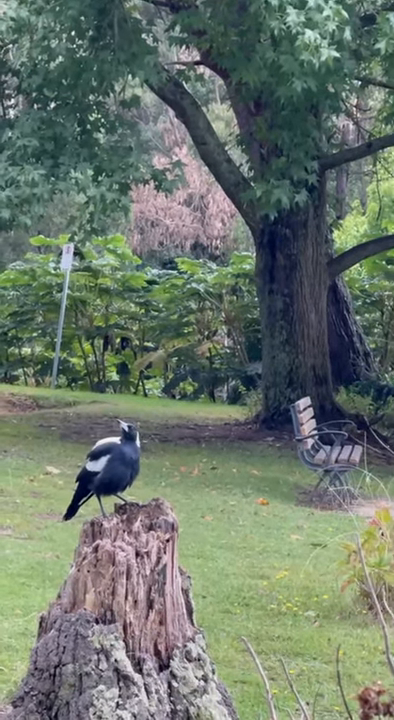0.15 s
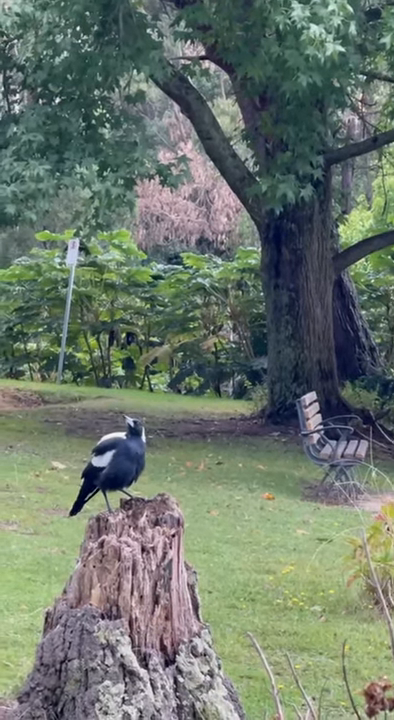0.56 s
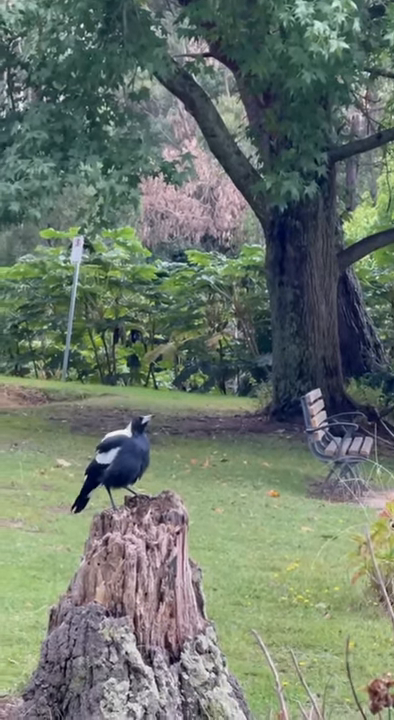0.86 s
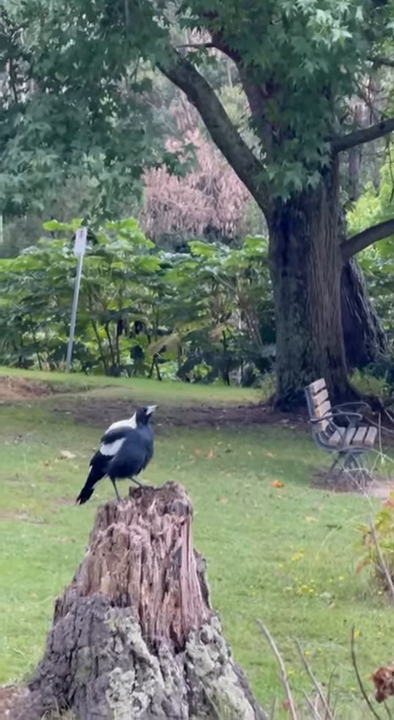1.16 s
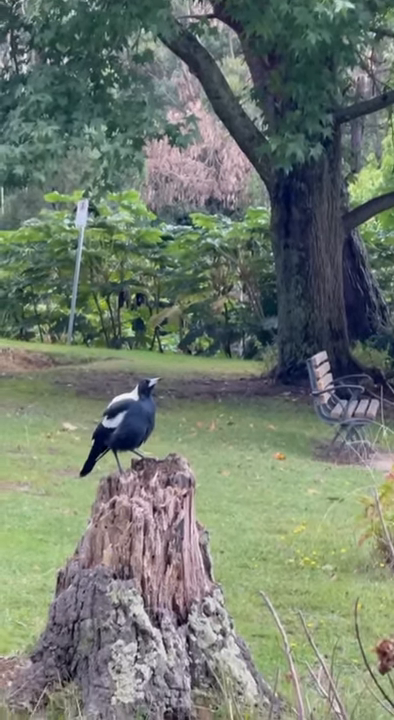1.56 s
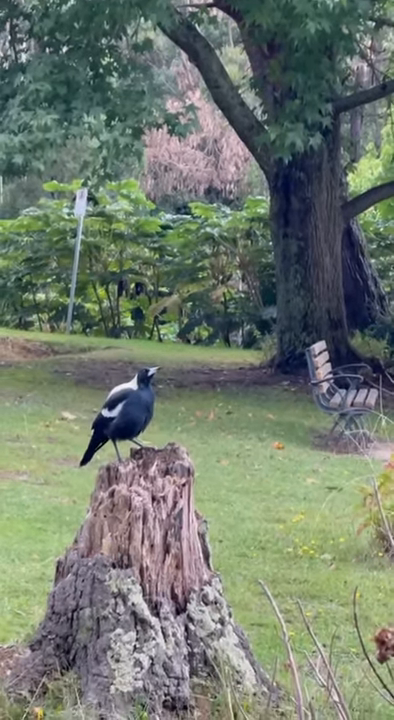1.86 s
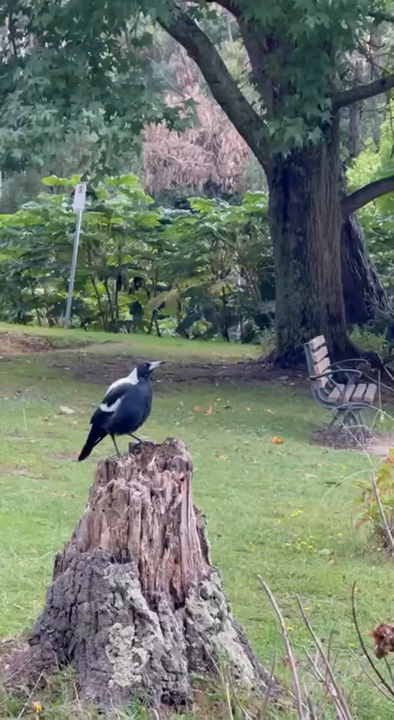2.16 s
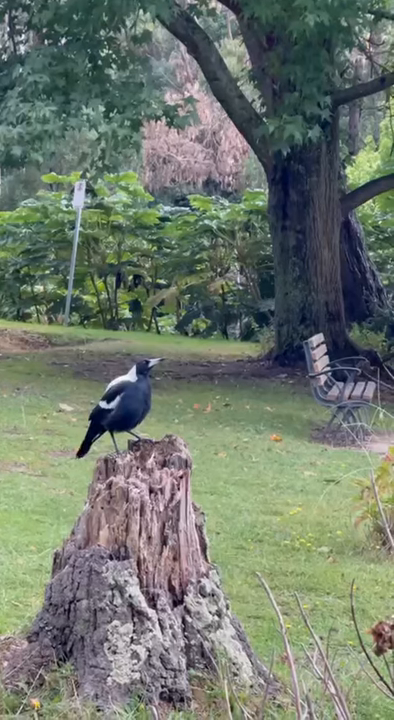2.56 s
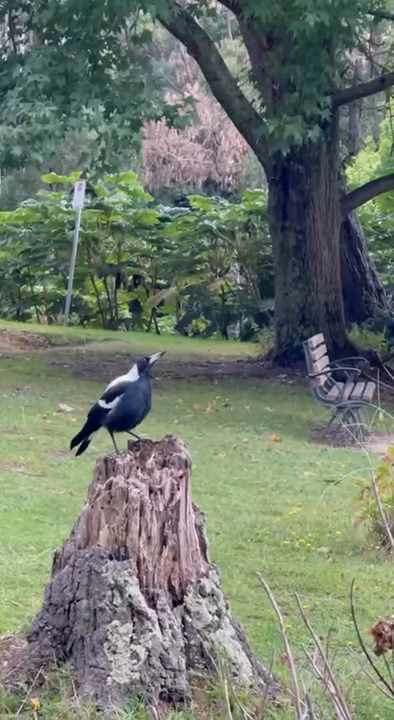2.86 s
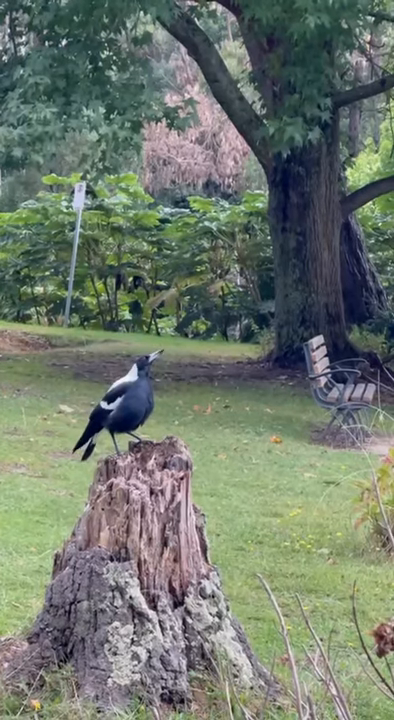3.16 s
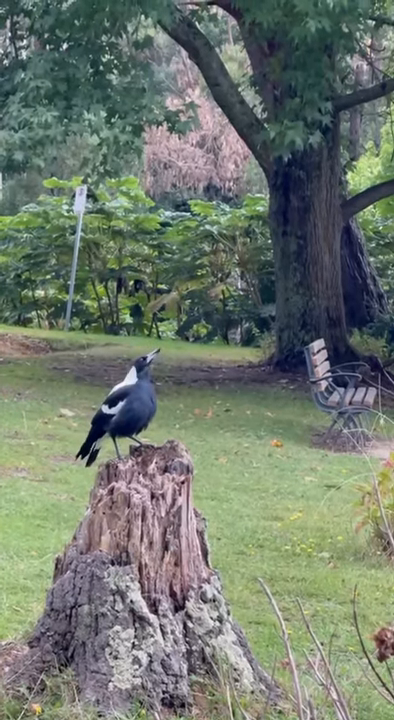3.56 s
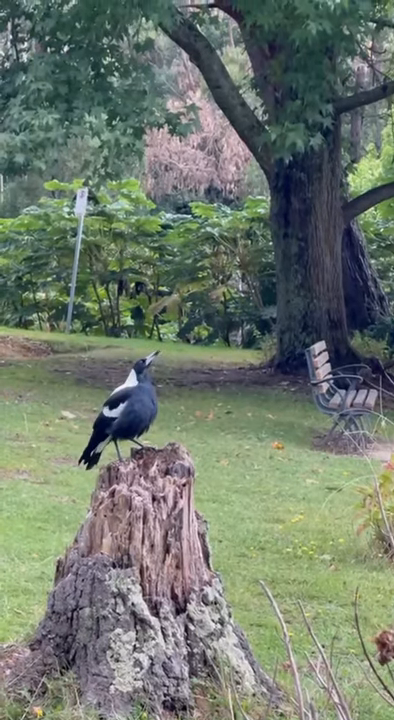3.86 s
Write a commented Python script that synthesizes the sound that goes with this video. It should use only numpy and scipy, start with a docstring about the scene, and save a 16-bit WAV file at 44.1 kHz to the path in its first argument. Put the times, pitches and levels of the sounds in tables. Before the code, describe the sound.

A magpie's fluting, warbled notes come in after a few seconds of quiet park background: soft insect hiss, pulsing frogs or crickets, far traffic and faint birds. The song grows louder near the end, echoing lightly among trees.

```python
"""A magpie on a stump in a quiet park starts its song: flute notes, short pips and warbled notes.
Each note is a gliding tone with hoarse overtones and breath; extra tones close beside it make it warble.
Behind it traffic rumbles, leaves rustle, frogs or crickets pulse, insects hiss in the trees, a far bird
whistles and a small bird chirps. Trees echo the birds, and the two microphone openings of a phone
hear the treble out of step."""
import sys
import numpy as np
from scipy import signal
from scipy.fft import rfft, irfft, next_fast_len
from scipy.io import wavfile
from scipy.ndimage import uniform_filter1d, map_coordinates

SR = 44100
rng = np.random.default_rng(int(sys.argv[2]) if len(sys.argv) > 2 else 0)


def transcribe(u):
    """Save the signal u as a 16-bit wav file named by the first command-line argument.

    u: samples, shape (n,) or (channels, n), limited to [-1, 1]; the rate is SR.
    q: integer samples, one column per channel.
    """
    v = np.clip(np.atleast_2d(u).T, -1, 1)
    q = np.round(v * 32767).astype(np.int16)
    wavfile.write(sys.argv[1], SR, q)


N = 176400
T = np.arange(N) / SR


def amp(db):
    """Turn decibels into a gain."""
    return 10 ** (np.asarray(db) / 20)


def unit(x):
    """Scale x to an average (rms) level of 1."""
    return x / np.sqrt(np.mean(x ** 2) + 1e-20)


def along(points, hz):
    """Read between (frequency_hz, value) points on a log frequency scale."""
    f, v = np.transpose(points)
    return np.interp(np.log(hz + 1), np.log(f + 1), v)


def filtered(x, response):
    """Multiply each frequency in x by response(hz)."""
    size = next_fast_len(N + SR // 2)
    return irfft(rfft(x, size) * response(np.fft.rfftfreq(size, 1 / SR)), size)[..., :N]


def wobble(rate):
    """A smooth curve through rate random points a second."""
    return map_coordinates(rng.standard_normal(int(N * rate / SR) + 4), [T * rate])


def noise(spectrum, patchy_db):
    """Stereo noise of level 1 with random louder and softer patches."""
    # stereo width, side compared with middle: frequency_hz, level_db
    width = [(30, -32), (60, -23), (110, -18), (190, -11), (340, -5), (610, -1), (1080, -3), (1500, -10),
             (1930, -20), (3450, -20), (6500, -26), (8000, -17)]
    white = signal.stft(rng.standard_normal((2, N)), nperseg=1024)[2]
    patches = uniform_filter1d(rng.standard_normal(white.shape[1:]), size=5, axis=0)
    patches = uniform_filter1d(patches, size=4, axis=1)
    pair = signal.istft(white * amp(patchy_db * unit(patches)), nperseg=1024)[1][:, :N]

    def gains(hz):
        gain = amp(along(spectrum, hz)) * (hz > .5 * spectrum[0][0]) * (hz < 2 * spectrum[-1][0])
        return gain * np.array([np.ones_like(hz), amp(along(width, hz))])
    mid, side = filtered(pair, gains)
    return unit(np.array([mid + side, mid - side]))


def add(out, start_s, x):
    """Mix x into out from start_s on."""
    i = round(start_s * SR)
    out[i:i + len(x)] += x[:N - i]


def ramp(u):
    """A smooth fade from 0 to 1."""
    return np.sin(np.pi / 2 * np.clip(u, 0, 1)) ** 2


def phase_of(hz):
    """The running phase of a changing pitch, in radians."""
    return 2 * np.pi * np.cumsum(hz) / SR


def traffic():
    """Far traffic makes a low rumble whose level dips now and then."""
    # loudness of the rumble: time_s, level_db
    levels = [(0.0, -79.5), (0.26, -68.5), (0.39, -61), (1.58, -61), (1.66, -74), (1.71, -61.5),
              (2.33, -58.5), (2.35, -80), (2.38, -62.5), (3.58, -62), (3.64, -69.5), (4.0, -67.5)]
    # its tone colour: frequency_hz, level_db
    colour = [(15, -39.5), (25, -11.5), (45, -6.5), (70, 1.5), (138, -7.5), (149, -4.5), (173, -14),
              (300, -25), (390, -49.5), (660, -120)]
    return amp(np.interp(T, *np.transpose(levels)) + 1.3 * wobble(8.6)) * noise(colour, patchy_db=1.0)


def leaves():
    """Air in the leaves makes a low, swelling rush and a brighter, steadier rustle."""
    # tone colour of the leaves: frequency_hz, level_db
    colour = [(200, 0.5), (400, -0.5), (570, -8.5), (1000, -13.5), (1500, -11.5), (2500, -16.5),
              (3340, -22), (3800, -23.5), (4800, -34), (6500, -23.5), (7200, -38)]
    # swells of the rush: time_s, relative_db
    swells = [(0.0, -84), (0.43, -77), (0.88, -75.5), (1.0, -80), (1.82, -87.5), (2.06, -82), (3.42, -83),
              (4.0, -76.5)]
    rush_db = np.interp(T, *np.transpose(swells)) + 5.5 + 0.54 * wobble(13)
    rush = amp(rush_db) * noise(colour[:4], patchy_db=2.5)
    rustle = amp(-75.5 + 0.27 * wobble(2.3)) * noise(colour[2:], patchy_db=3.5)
    return rush + rustle


def frogs_or_crickets():
    """One caller's short pulses ring over the blur of many far ones."""
    # the caller's pulses: start_s, relative_db
    pulses = [(0.0189, -61.5), (0.1151, -64.5), (0.2079, -62), (0.3037, -67), (0.3905, -63), (0.4948, -59),
              (1.05, -61.5), (1.1428, -66), (1.2366, -57.5), (1.3264, -63), (1.4162, -58), (1.512, -57),
              (1.6072, -56.5), (1.6995, -55.5), (1.7918, -59), (1.8861, -57), (1.9789, -58),
              (2.0757, -59.5), (2.1675, -59.5), (2.2568, -74), (2.355, -61), (2.4523, -61), (2.5446, -64),
              (2.6414, -62.5), (2.7282, -63), (2.817, -59), (2.8888, -65)]
    # tones that ring in a pulse: pitch_hz, relative_db, ring_s (time to fade by 60 dB)
    tones = [(1853, 1, 0.061), (1969, -6.5, 0.076), (2074.1, 7, 0.06), (2194, 2, 0.088), (2580, -14, 0.091)]
    # loudness of the far chorus: time_s, level_db
    chorus_levels = [(0.0, -76), (0.4, -73.5), (0.56, -79.5), (0.86, -83.5), (1.15, -75.5), (1.48, -75),
                     (3.02, -75), (3.25, -69.5), (3.52, -68.5), (4.0, -70)]
    # its tone colour: frequency_hz, level_db
    chorus_colour = [(1500, -13.5), (1850, -9.5), (2080, -1), (2250, -5), (2550, -13.5), (3000, -47)]
    caller, t = np.zeros(N), np.arange(SR // 10) / SR
    for start, db in pulses:
        stray_db, phases = rng.standard_normal((2, len(tones))) * [[2], [3]]
        ring = sum(amp(level + stray - 60 * t / ring_s) * np.sin(2 * np.pi * hz * t + phase)
                   for (hz, level, ring_s), stray, phase in zip(tones, stray_db, phases))
        add(caller, start, amp(db - 7) * ring * ramp(t / 0.0055))
    chorus_db = np.interp(T, *np.transpose(chorus_levels)) + 1.7 * wobble(22)
    return caller + amp(chorus_db) * noise(chorus_colour, patchy_db=1.5)[0]


def insects():
    """Insects hiss in the trees while a near one makes short, falling zips."""
    # the near insect's zips: start_s, relative_db
    calls = [(0.0937, -63), (0.21, -65), (0.3067, -65), (0.444, -63.5), (0.5594, -64.5), (0.6439, -72),
             (0.745, -67.5), (0.8405, -82), (1.036, -80), (1.1134, -76), (1.2176, -71), (1.349, -68.5),
             (1.4335, -81), (1.5464, -82), (1.6488, -82), (1.7798, -74), (1.9026, -72), (2.0058, -72),
             (2.1405, -68), (2.2549, -68), (2.3337, -69), (2.395, -68.5), (2.5082, -65), (2.6262, -65.5),
             (2.8714, -63), (2.99, -65), (3.11, -65), (3.238, -69), (3.3388, -69), (3.483, -69.5),
             (3.5934, -66), (3.6955, -65), (3.8565, -72), (3.9609, -67)]
    # tone colour of the hiss: frequency_hz, level_db
    colour = [(6500, -35.5), (6950, -10.5), (7300, -2), (7800, 3), (8300, 9.5), (8800, -18), (9500, -20),
              (10400, -17.5), (11500, -25.5)]
    zip_s, from_hz, to_hz = 0.027, 7640, 7000
    zips, u = np.zeros(N), np.linspace(0, 1, round(zip_s * SR))
    one_zip = np.sin(np.pi * u) * np.sin(phase_of(from_hz + (to_hz - from_hz) * u))
    for start, db in calls:
        add(zips, start, amp(db - 3) * one_zip)
    zips *= amp(2.0 * wobble(200))
    hiss_db = -68.5 + wobble(4) + 0.97 * wobble(7.6)
    return zips + amp(hiss_db) * noise(colour, patchy_db=2.5)


def far_bird():
    """Thin whistles: pure tones whose pitch bends once."""
    # whistles: start_s, length_s, from_hz, bend_hz, to_hz, level_db
    whistles = [(3.395, .03, 6130, 5510, 5340, -75.5), (3.804, .04, 2250, 2066, 1910, -64),
                (.10, 0.025, 3650, 3650, 3460, -76), (.68, 0.077, 3384, 3480, 3370, -80.5),
                (.96, 0.078, 3280, 3210, 3100, -80.5), (2.315, 0.0267, 2424, 2670, 2600, -70),
                (2.315, .03, 2014, 1740, 1810, -69.5), (2.92, 0.056, 2305, 2247, 2460, -68.5),
                (3.03, .03, 2433, 2385, 2300, -59.5), (3.055, 0.038, 2280, 2180, 2450, -61.5),
                (3.16, 0.074, 2340, 2208, 2450, -63), (3.24, 0.076, 2177, 2218, 2230, -63),
                (3.30, 0.077, 2300, 2160, 2504, -59), (3.45, 0.0992, 2270, 2134, 2266, -59.5),
                (3.61, 0.079, 2350, 2247, 2110, -61), (3.68, 0.062, 2112, 2130, 2220, -58)]
    out = np.zeros(N)
    for start, length, from_hz, bend_hz, to_hz, db in whistles:
        u = np.linspace(0, 1, round(length * SR))
        pitch = np.interp(u, [0, .6, 1], [from_hz, bend_hz, to_hz])
        add(out, start, amp(db) * np.sin(np.pi * u) * np.sin(phase_of(pitch)))
    return out


def small_bird():
    """Rough, nasal chirps: breath and the overtones of a pitch that arches up and down."""
    # chirps: start_s, length_s, top_hz, relative_db, start_drop, end_drop (shares of the top pitch)
    chirps = [(1.36, 0.043, 1500, -68.5, 0.143, .09), (2.06, 0.047, 1463, -61, .18, 0.17),
              (2.736, 0.044, 1432, -62, 0.19, .17)]
    # overtones of the voice: pitch_multiple, relative_db
    overtones = [(2, -26.5), (3, -2.5), (4, 3), (5, -2), (6, -8), (7, -6.5)]
    # tone colour of the breath: frequency_hz, level_db
    breath_colour = [(3000, 8), (4200, -13), (6000, -3), (8000, 9), (10500, 0), (11500, -25)]
    out, jitter = np.zeros(N), 0.0077 * wobble(400)
    breath = amp(-7.5) * noise(breath_colour, patchy_db=7.0)[0]
    for start, length, top_hz, db, start_drop, end_drop in chirps:
        u = np.linspace(-1, 1, round(length * SR))
        here = slice(round(start * SR), round(start * SR) + len(u))
        arch = 1 - np.where(u < 0, start_drop, end_drop) * np.abs(u) ** 2.24
        phase = phase_of(top_hz * (arch + jitter[here]))
        voice = sum(amp(level) * np.sin(n * phase) for n, level in overtones) + breath[here]
        add(out, start, amp(db) * (1 - u * u) ** 1.05 * voice)
    return out * amp(3.5 * wobble(260))  # fast flutter makes it rough


def warble(t, start, length, swell_s, from_hz, to_hz, below_db, above_db, step_db, lag):
    """Four side tones below a note and four above beat against it, so it warbles."""
    beat = phase_of(from_hz + (to_hz - from_hz) * t / length)
    beat = beat - np.interp(swell_s - start, t, beat) - lag
    return 1 + sum(amp(side_db + step_db * (k - 1)) * np.exp(1j * (side * k * beat - lag * k * k))
                   for k in range(1, 5) for side, side_db in ((-1, below_db), (0.99, above_db)))


def rasp(breath, colour):
    """The loudest magpie note rasps: a scrap of noise repeats at about the rate of its warble."""
    start_s, end_s, rise_s, fall_s = 3.684, 3.788, .012, .06
    repeat_hz, buzz_share = 92, 0.81
    scrap = rng.standard_normal(SR)[:round(SR / repeat_hz)]
    buzz = unit(filtered(np.resize(scrap, N), lambda hz: amp(along(colour, hz))))
    fade = ramp((T - start_s) / rise_s) * ramp((end_s - T) / fall_s)
    return amp(-54) * fade * (buzz_share * buzz + (1 - buzz_share ** 2) ** .5 * breath)


def magpie():
    """Gliding flute notes; as a note swells, its hoarse overtones and breath grow faster than its tone."""
    # pure notes and pips: start_s, length_s, rise_s, fall_s, from_hz, to_hz, level_db (before fading),
    # sag_db (lost over the note), overtones_db (relative)
    notes = [(2.882, .014, 0.0045, 0.0075, 705, 720, -48, 3, -28),
             (2.889, 0.01, 0.0053, .005, 997, 1099, -42, 5, -33),
             (3.028, 0.018, .005, .005, 1838, 1650, -50.5, 8.5, -28),
             (3.046, 0.011, 0.0026, 0.0051, 1653, 1310, -34.5, -0.5, -27),
             (3.049, 0.098, 0.016, .008, 1362, 1340, -38.5, 17.5, -29),
             (3.151, 0.017, .009, 0.0077, 1030, 1050, -52, 8, -31),
             (3.164, 0.063, 0.036, 0.044, 664, 706, -36.5, 6.5, -41.5),
             (3.330, 0.052, 0.041, 0.0084, 1614, 1534, -46, 0, -26),
             (3.372, .018, 0.0075, 0.0073, 1517, 1370, -50, -3.5, -46),
             (3.392, 0.021, 0.0096, .006, 1410, 1390, -54.5, 1, -46),
             (3.368, 0.031, 0.012, 0.0094, 1200, 1247, -59, -7, -42),
             (3.408, 0.026, 0.0077, .018, 884, 944, -34.5, 3.5, -30),
             (3.418, 0.089, 0.0061, 0.066, 926.4, 925, -41, 16.5, -23),
             (3.419, .052, 0.0273, 0.014, 1811, 1886, -49, -3.5, -26),
             (3.619, 0.056, .026, .020, 1144, 1150, -52.5, -1, -33),
             (3.672, 0.016, 0.0081, 0.0093, 870, 883, -38.5, -7, -28.5),
             (3.682, 0.017, 0.0077, 0.0064, 1320, 1371, -42.5, -8, -15),
             (3.829, 0.02, .009, 0.0069, 628, 680, -47.5, -10, -29.5),
             (3.846, 0.0254, 0.0063, 0.015, 690, 682, -34, 6, -27),
             (3.855, 0.01358, 0.0087, 0.0069, 976, 987, -32.5, 1, -39),
             (3.858, .013, 0.0053, 0.011, 1390, 1380, -49, -1, -29),
             (3.978, 0.033, 0.012, 0.01, 700, 827, -44.5, -0.5, -37)]
    # warbled notes: the same columns, then swell_s (lines up the beat), beat_from_hz, beat_to_hz,
    # below_db, above_db (nearest side tones), step_db (each further one), lag_radians
    warbled_notes = [(2.897, 0.085, 0.004, .02, 790.8, 744, -47.5, 28.5, -36, 2.901, 126, 126, -9.5, -17, -18, 0.67),
                     (3.219, .112, 0.039, 0.043, 1138, 1117, -45.5, 2.5, -26.5, 3.258, 70.9, 71.8, -16, -4, -4.5, 0.45),
                     (3.500, 0.092, 0.049, 0.027, 841, 814, -41.5, 5, -33.5, 3.2, 80.5, 80.6, 0, -13, -7, 1.2),
                     (3.695, .130, .011, 0.031, 926.5, 876.6, -25.5, 24, -28, 3.709, 92.6, 101, -6.5, -14, -19, 1.5),
                     (3.856, .150, 0.0102, 0.0071, 661.7, 631.3, -43.5, 14.5, -30.5, 3.872, 127.3, 124.6, -16.5, -13, -12.5, 1.53)]
    # overtones of the voice: pitch_multiple, relative_db
    overtone_levels = [(2, -0.5), (3, -6), (4, -9.5), (5, -11), (6, -16.5)]
    # how the throat colours the overtones: frequency_hz, gain_db
    throat = [(1500, 7.5), (2200, 2), (3000, -7), (3900, -1), (4600, -4.5), (5400, -9), (6200, -29)]
    # tone colour of the breath: frequency_hz, level_db
    breath_colour = [(900, -21.5), (1800, 2.5), (2600, -5), (3900, 1), (4300, -28), (5400, -13.5),
                     (6000, -40.5), (8800, -27), (9650, 8.5), (10400, -9), (11200, -33.5)]
    tone, overtones, force = np.zeros((3, N))
    for start, length, rise, fall, from_hz, to_hz, db, sag_db, over_db, *beat in notes + warbled_notes:
        t = np.arange(round(length * SR)) / SR
        u = t / length
        fade = ramp(t / rise) * ramp((length - t) / fall)
        sag = amp(-sag_db * u ** 1.57)  # the note holds before it sags
        note = fade * sag * np.exp(1j * phase_of(from_hz + (to_hz - from_hz) * u))
        if beat:
            note *= warble(t, start, length, *beat)
        strength = np.abs(note) + 1e-9
        stack = sum(amp(level) * (note / strength) ** n for n, level in overtone_levels).real
        add(tone, start, amp(db) * note.real)
        add(overtones, start, amp(db + over_db) * strength ** 1.54 * stack)
        add(force, start, (amp(db) * strength) ** 1.5)
    breath = noise(breath_colour, patchy_db=4.0)[0]
    raspy = rasp(breath, breath_colour)
    hoarse = filtered(overtones * (1 + 0.41 * wobble(350)), lambda hz: amp(along(throat, hz)))
    flute = tone * (1 + 0.045 * wobble(120))
    return flute + hoarse + raspy + amp(-31) * force * breath


def echoes(x, channels):
    """Trees scatter the sound back; each frequency dies away at its own speed."""
    # the park's echo: frequency_hz, ring_s (time to fade by 60 dB)
    ring_times = [(500, 0.56), (2000, 0.32), (5000, 0.52), (10000, 0.16)]
    hz, t, white = signal.stft(rng.standard_normal((channels, SR // 2)), SR, nperseg=256)
    tail = signal.istft(white * amp(-60 * t / along(ring_times, hz)[:, None]), SR, nperseg=256)[1]
    delayed = np.pad(x, (600, 0))[None]
    return signal.fftconvolve(delayed, tail / np.linalg.norm(tail[0]), axes=1)[:, :N]


def scene():
    """Three birds and their echoes over the park's background, the magpie a little to the left."""
    song, small, far = magpie(), small_bird(), far_bird()
    birds = song * amp([[1.5], [-1.5]]) + amp(-18.5) * echoes(song, channels=2)
    birds += small + amp(-14.5) * echoes(small, channels=1)
    birds += far + amp(-12.5) * echoes(far, channels=1)
    return birds + frogs_or_crickets() + insects() + traffic() + leaves()


def record(dry):
    """The two microphone openings put the treble out of step; nothing above top_hz gets through."""
    # how far the left side runs ahead of the right: frequency_hz, lead_radians
    lead = [(6500, 0), (7000, 0.24), (8600, 3.5), (10200, 3), (10500, 4.5), (11100, 5)]
    top_hz = 11580
    return filtered(dry, lambda hz: np.exp(.5j * np.outer([1, -1], along(lead, hz))) * (hz < top_hz))


dry = scene()
out = record(dry)
transcribe(out)
```